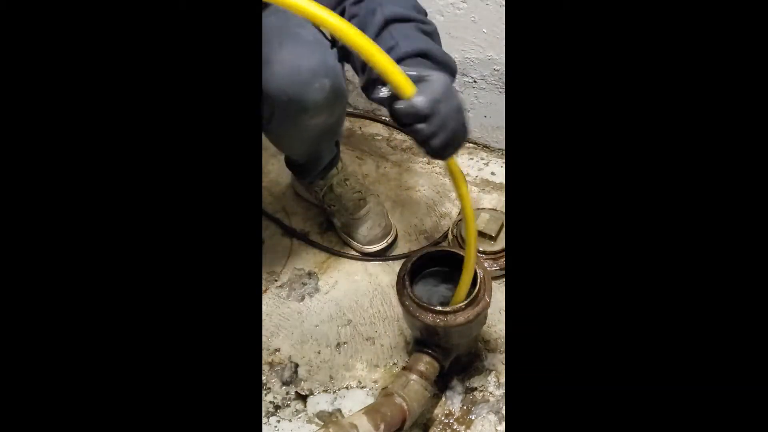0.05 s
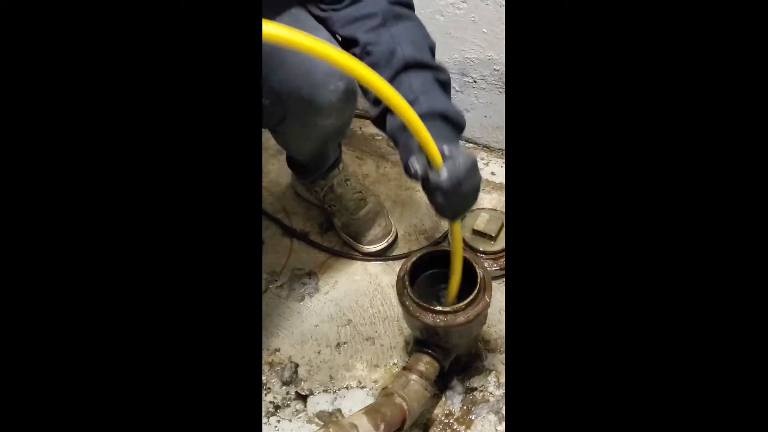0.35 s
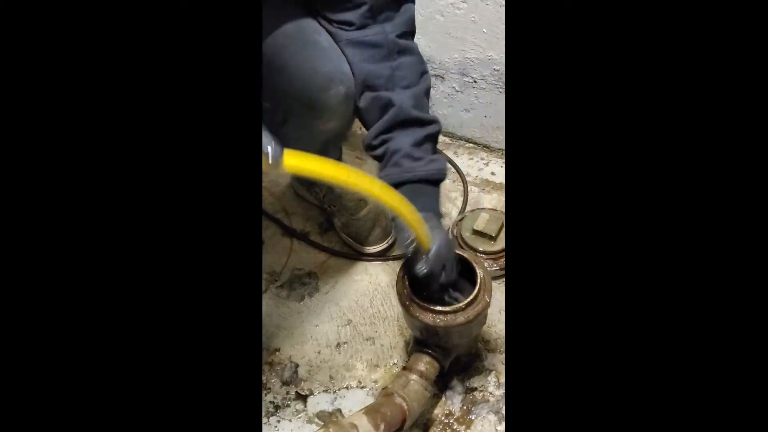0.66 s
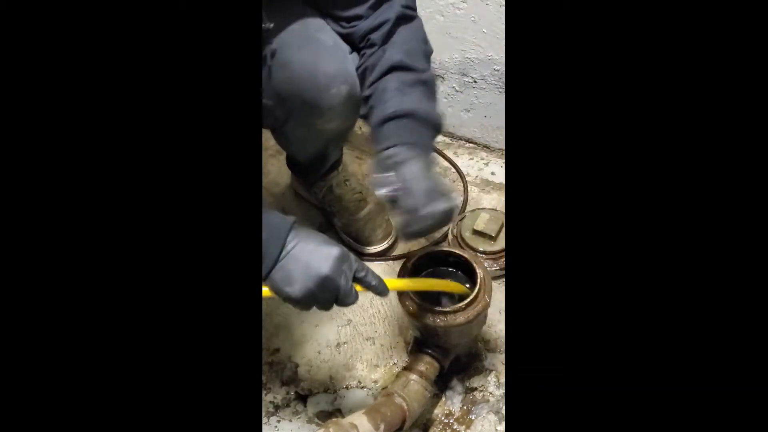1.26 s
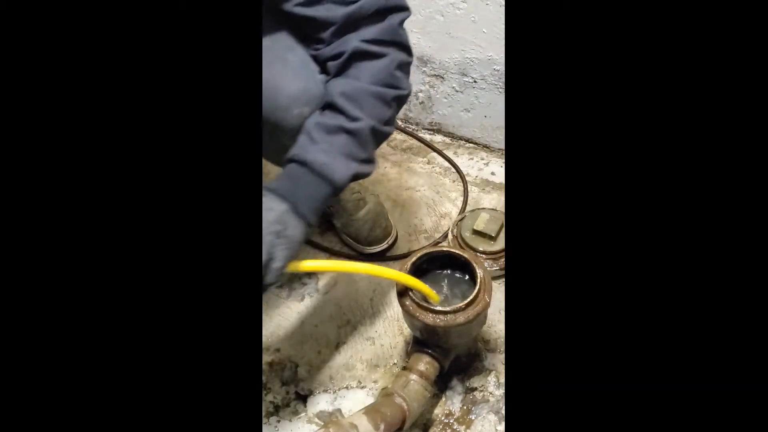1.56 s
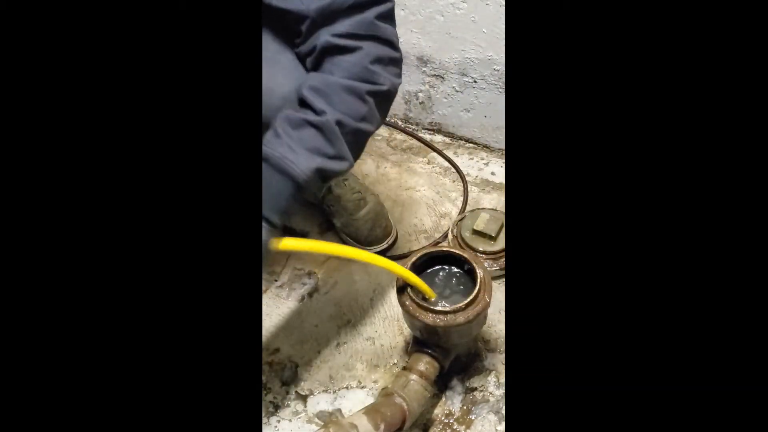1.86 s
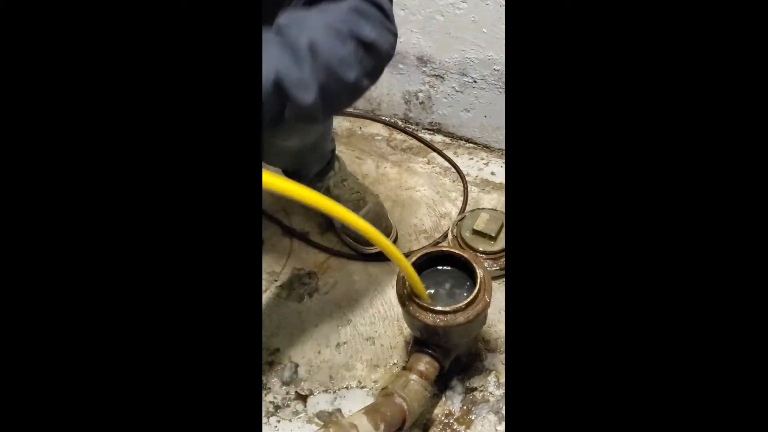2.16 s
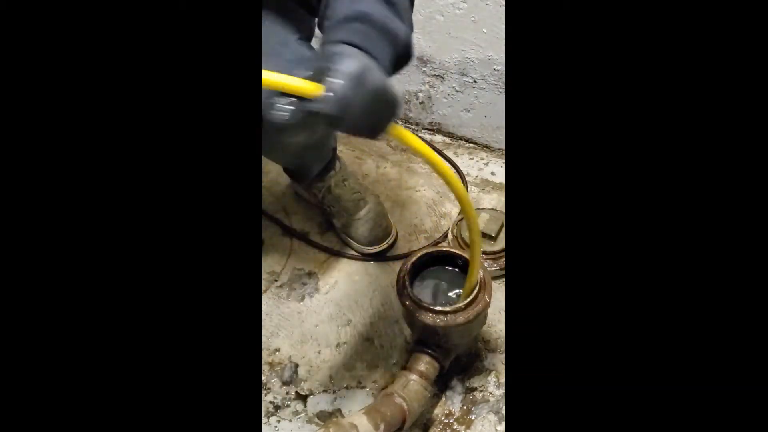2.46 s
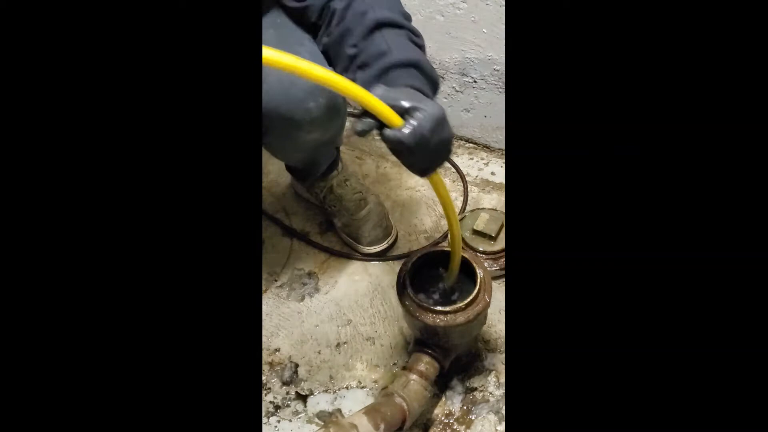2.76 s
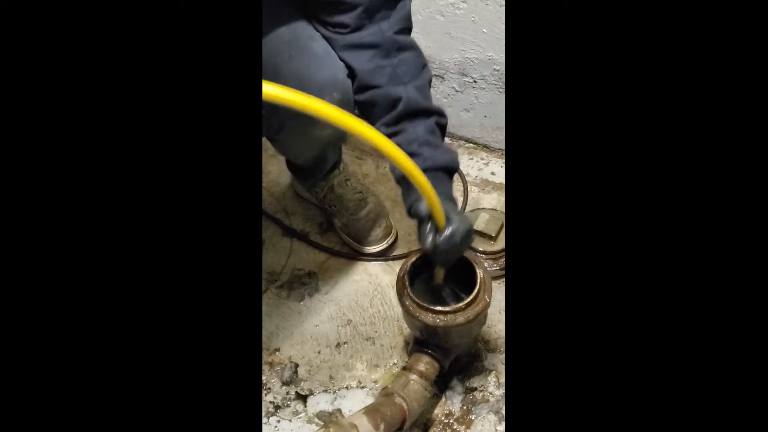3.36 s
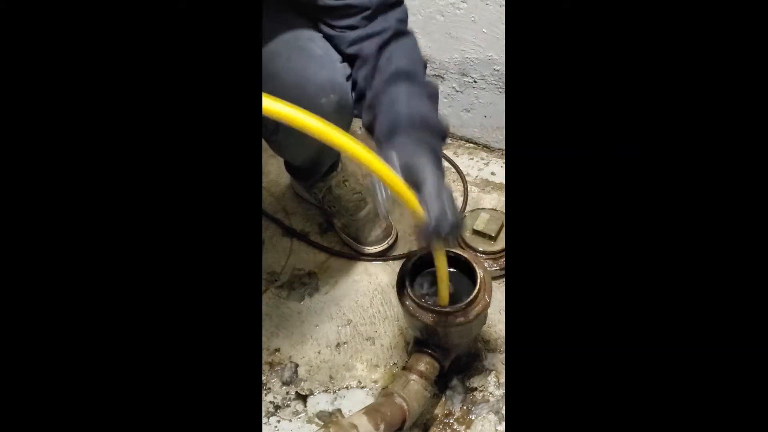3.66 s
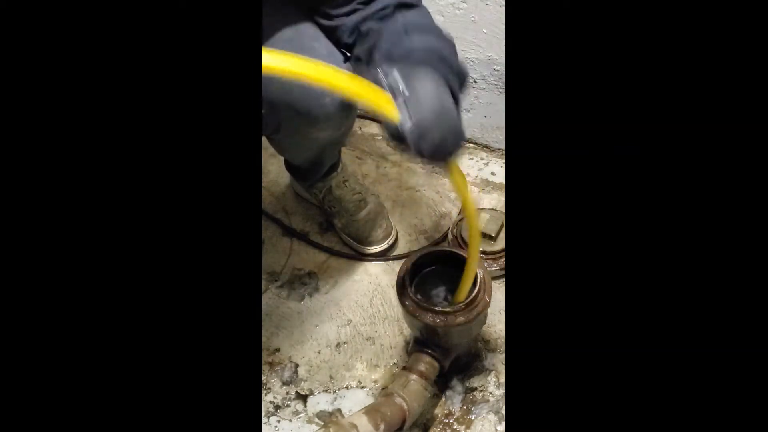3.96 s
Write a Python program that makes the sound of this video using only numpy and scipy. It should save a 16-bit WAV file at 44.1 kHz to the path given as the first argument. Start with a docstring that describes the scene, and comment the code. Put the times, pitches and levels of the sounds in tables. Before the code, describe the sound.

High motor whine of a drain cleaner, with a hose scraping hollowly inside a drain.

```python
"""Drain cleaning machine in a basement

A hose is fed by hand into a floor drain. Over a bed of rushing cooling air, the motor whines on
multiples of its shaft speed, which wavers with the load. The hose scrapes inside the pipe with
an uneven rumble and a hollow boom that throbs, with a dull knock, whenever it catches."""
import sys
import numpy as np
from scipy import signal
from scipy.fft import rfft, irfft
from scipy.io import wavfile
from scipy.ndimage import uniform_filter1d

SR = 44100
rng = np.random.default_rng(int(sys.argv[2]) if len(sys.argv) > 2 else 0)


def wrap_up_sound(samples):
    """Save the sound to the file named by the first command line argument, as 16-bit audio."""
    columns = np.atleast_2d(samples).T
    # keep every value between -1 and 1, then stretch to whole-number steps
    tamed = np.clip(columns, -1, 1)
    steps = np.round(tamed * 32767).astype(np.int16)
    wavfile.write(sys.argv[1], SR, steps)


N = 176400
TIME = np.arange(N) / SR
FREQS = np.maximum(np.arange(N // 2 + 1) * SR / N, 1)

# stereo image of the noise layers: (frequency [Hz], left-right correlation [0-1])
STEREO_LIKENESS = [(30, 0.5), (130, 0.93), (260, 0.83), (520, 0.66), (1000, 0.28), (3000, 0), (15000, 0)]
# colour of the air rush: (frequency [Hz], left base density [dB], right base density [dB])
AIR_SPECTRUM = [(20, -92, -90), (70, -91, -75), (154, -89.5, -76), (286, -75.5, -63), (480, -75, -77.5),
                (830, -84, -76), (1500, -76, -72.5), (1980, -72, -80.5), (2420, -74, -69.5),
                (2980, -64.5, -64.5), (3570, -68, -70), (4490, -65, -67), (5100, -72.5, -75),
                (5600, -69, -76), (6560, -73.5, -74.5), (7370, -72, -80), (9700, -87, -78),
                (10400, -78.5, -80.5), (11200, -80.5, -87), (11800, -82, -80), (12900, -84.5, -83),
                (14600, -79.5, -81.5), (15600, -81, -82)]
# housing resonances in the air stream: (frequency [Hz], half-width [Hz], left [dB], right [dB])
HOUSING_MODES = [(717, 7, -59, -53), (656, 8, -60, -57), (802, 5, -72, -60), (1183, 36, -62, -42.5),
                 (1250, 30, -59, -50), (2772, 45, -53, -44), (2903, 45, -51, -45.5), (4570, 60, -50, -53),
                 (10150, 220, -60, -51)]

# pitch of the main whine under load: (time [s], pitch [Hz])
WHINE_PITCH = [(0.0, 3512), (0.24, 3536), (0.3, 3505), (0.34, 3501), (0.46, 3505), (0.54, 3527),
               (0.58, 3525), (0.76, 3482), (0.92, 3534), (1.18, 3514), (1.28, 3535), (1.36, 3532),
               (1.44, 3543), (1.48, 3533), (1.54, 3497), (1.6, 3506), (1.68, 3533), (1.78, 3538),
               (1.86, 3549), (1.92, 3511), (2.1, 3542), (2.26, 3551), (2.32, 3520), (2.44, 3541),
               (2.52, 3536), (2.62, 3541), (2.72, 3514), (2.9, 3502), (3.04, 3522), (3.1, 3495),
               (3.14, 3496), (3.2, 3515), (3.3, 3529), (3.36, 3527), (3.42, 3497), (3.48, 3499),
               (3.54, 3521), (3.7, 3536), (3.8, 3483), (3.9, 3511), (3.96, 3505), (4.0, 3510)]
# motor tones: (shaft multiple, left base level [dB], right base level [dB], room share [0-1])
MOTOR_TONES = [(3, -48, -48, .3), (12, -52, -65, .5), (19, -53, -45.5, .4), (22, -46, -45.5, .25),
               (23.33, -48, -52, .7), (24, -31, -31, .1), (25, -37, -39.5, .3), (28, -45, -44.5, .2),
               (31, -44, -47.5, .35), (39, -51, -57, .9), (47, -53, -56.5, .7), (48.27, -37, -45, .2),
               (50, -56, -59, .8)]
# stereo phase of some tones: {shaft multiple: lead of the left side [rad]}
TONE_LEAD = {22: -2.0, 25: .3, 28: -.5, 31: -1.1, 48.27: .5}
# level ride of the main whine, taken about its mean: (time [s], left [dB], right [dB])
WHINE_RIDE = [(0.0, -30.0, -31.0), (0.22, -30.0, -33.0), (0.4, -28.0, -30.0), (0.92, -33.5, -34.0),
              (1.18, -30.5, -32.5), (1.28, -34.0, -35.5), (1.58, -33.0, -31.0), (1.74, -33.0, -34.0),
              (2.64, -35.0, -35.0), (3.02, -31.5, -32.0), (3.12, -34.0, -30.0), (3.26, -30.5, -35.5),
              (3.48, -34.0, -30.5), (3.58, -32.5, -37.0), (3.8, -36.0, -31.0), (4.0, -34.5, -34.5)]
# level ride of the whistle an octave above, taken about its mean: (time [s], level [dB])
WHISTLE_RIDE = [(0.0, -39.5), (0.26, -37), (0.44, -50), (0.56, -34), (0.66, -45.5), (0.74, -37.0),
                (0.82, -43), (0.88, -32.5), (1.2, -38), (1.54, -41.5), (1.7, -38.5), (1.8, -41.5),
                (2.28, -40.5), (2.64, -41), (3.34, -41), (3.4, -42.5), (3.66, -39), (4.0, -42.5)]

# push of the scraping hose: (time [s], bass base level [dB], low-mid level [dB])
SCRAPE_LEVEL = [(0, -51, -37.5), (.25, -51, -37), (.275, -36, -24.5), (.34, -34, -27.5), (.4, -34, -33),
                (.47, -43, -33), (.54, -44, -37.5), (.8, -39, -40), (1, -36.5, -39), (1.15, -35, -31),
                (1.23, -40, -37.5), (1.5, -40, -31), (1.6, -37, -36), (1.85, -41.5, -43),
                (2.15, -53.5, -45), (2.37, -46.5, -42), (2.4, -34, -28.5), (2.55, -38.5, -33.5),
                (2.68, -35, -31.5), (2.9, -40.5, -32), (2.98, -40, -37.5), (3.4, -42.5, -38.5),
                (3.62, -41, -35.5), (3.85, -44, -42), (4, -43, -42.5)]
# bass modes of the pipe: (frequency [Hz], half-width [Hz], relative level [dB])
PIPE_BASS_MODES = [(54, 6.5, -18), (74, 9.3, -16.5), (85, 6.2, -8.5), (114.8, 6, -3.5), (133, 6.7, -9.5),
                   (148.1, 12.5, 1.5), (160, 4, -4.5), (189, 6, -2.5)]
# low-mid modes of the pipe: (frequency [Hz], half-width [Hz], relative level [dB])
PIPE_MID_MODES = [(225, 7.8, 1), (263, 8.7, 0.5), (282.5, 17, -9.5), (297, 21, -4), (312.6, 13.5, -0.5),
                  (334, 8.2, -2.5), (369, 5.7, -11), (399, 14, -14), (418, 9.8, -12), (509, 19, -13),
                  (636, 55, -15.5)]
# sustained hollow boom of the pipe: (time [s], level [dB])
BOOM_LEVEL = [(0, -43), (.23, -48), (.3, -42), (.5, -32), (.7, -43.5), (.9, -34), (1.05, -35), (1.19, -45),
              (1.35, -32.5), (1.6, -34.5), (1.88, -36), (2.15, -53), (2.36, -51), (2.48, -29), (2.6, -29.5),
              (2.75, -35.5), (3.1, -41.5), (3.52, -42), (3.7, -32), (4, -37)]
# swells of the boom as the hose catches: (time [s], peak level [dB], half-length [s])
CATCHES = [(0.318, -17, 0.044), (0.435, -25.5, 0.036), (0.494, -28.5, 0.018), (0.88, -27.5, 0.013),
           (0.965, -26, 0.024), (1.031, -22, 0.054), (1.131, -22, 0.03), (1.235, -25.5, 0.027),
           (1.432, -29, 0.034), (1.555, -28.5, 0.046), (1.643, -26.5, 0.016), (2.51, -31.5, .05),
           (2.701, -29, .03), (2.83, -29, 0.029), (3.06, -35, 0.058), (3.26, -33.5, 0.034),
           (3.407, -35, 0.05), (3.58, -33.5, 0.027), (3.931, -28, 0.033)]
# knock of the hose on the pipe wall: (frequency [Hz], half-width [Hz], relative level [dB])
WALL_MODES = [(524, 63, 1), (665, 130, -1.5), (1000, 180, -2)]


def from_db(db):
    """Decibels to gain."""
    return 10 ** (np.asarray(db) / 20)


def rms_one(x):
    """Scale to rms 1."""
    return x / np.sqrt(np.mean(x ** 2) + 1e-20)


def in_time(rows):
    """Each column of an envelope at every sample."""
    times, *columns = np.transpose(rows)
    return [np.interp(TIME, times, c) for c in columns]


def in_hz(rows):
    """Each column of a spectrum at every frequency."""
    hz, *columns = np.transpose(rows)
    return np.array([np.interp(np.log(FREQS), np.log(hz), c) for c in columns])


def ride(rows):
    """Each column of a level envelope in dB about its mean."""
    db = np.array(in_time(rows))
    return db - db.mean(axis=1, keepdims=True)


def drift(rate_hz):
    """Smooth random modulation of rms 1, rolling off above the given rate."""
    hop, settle = 40, 2000
    pole = np.exp(-2 * np.pi * rate_hz * hop / SR)
    noise = rng.standard_normal(N // hop + settle + 2)
    slow = signal.lfilter([1], [1, -2 * pole, pole * pole], noise)[settle:]
    return np.interp(np.arange(N) / hop, np.arange(len(slow)), rms_one(slow))


def resonance(hz, half_width_hz):
    """Gain of a steep-sided resonance that turns unit white noise into rms 1."""
    return rms_one(1 / (1 + ((FREQS - hz * hz / FREQS) / (2 * half_width_hz)) ** 2))


def stereo_noise(power):
    """Noise with the given power spectrum, narrow in the bass and wide in the treble."""
    mid, side = rfft(rng.standard_normal((2, N)))
    alike = in_hz(STEREO_LIKENESS)[0]
    white = (np.sqrt(1 + alike) * mid + np.sqrt(1 - alike) * side * [[1], [-1]]) / np.sqrt(2)
    return irfft(white * np.sqrt(power), N)


def cooling_air():
    """A broad, faintly flickering rush with the resonances of the housing standing out of it."""
    trim_db, flicker_db = 0.16, 0.62
    power = from_db(in_hz(AIR_SPECTRUM) + trim_db) ** 2 * SR / 2
    for hz, half_width_hz, left_db, right_db in HOUSING_MODES:
        power += (from_db([[left_db], [right_db]]) * resonance(hz, half_width_hz)) ** 2
    return stereo_noise(power) * from_db(flicker_db * drift(rate_hz=10))


def motor_whine():
    """Tones locked to the shaft, each a clean direct part plus a flickering part from the room."""
    whine_order = 24   # shaft multiple of the main whine
    drive_hz, wobble, jitter, flutter_db = 16.3, 0.0018, 0.001, 1.06
    ring_hz, ring_half_width_hz, ring_peak_db = 3250, 14, 7.5
    # each turn of the drive tugs at speed and level
    drive = np.sin(2 * np.pi * np.cumsum(drive_hz * (1 + 0.024 * drift(rate_hz=2.4))) / SR)
    waver = 1 + wobble * drive + jitter * drift(rate_hz=30.4)
    shaft_hz = in_time(WHINE_PITCH)[0] / whine_order * waver
    shaft_angle = 2 * np.pi * np.cumsum(shaft_hz) / SR
    rides_db = {whine_order: ride(WHINE_RIDE), 2 * whine_order: ride(WHISTLE_RIDE)}
    tilt_orders = [MOTOR_TONES[0][0], whine_order, MOTOR_TONES[-1][0]]
    out = np.zeros((2, N))
    for order, left_db, right_db, room_share in MOTOR_TONES:
        lead = np.array([[TONE_LEAD.get(order, 0)], [0]])
        phase = order * shaft_angle + rng.uniform(0, 2 * np.pi) + lead
        room = np.array([drift(rate_hz=28) * np.cos(p) + drift(rate_hz=28) * np.sin(p) for p in phase])
        tone = np.sqrt(2 * (1 - room_share)) * np.cos(phase) + np.sqrt(room_share) * room
        tilt_db = np.interp(order, tilt_orders, [3.57, -0.58, -1.25])
        # a narrow housing resonance lifts any tone that glides through it
        ring_db = ring_peak_db / (1 + ((order * shaft_hz - ring_hz) / ring_half_width_hz) ** 2)
        gain = from_db(tilt_db + ring_db + rides_db.get(round(order), 0) + flutter_db * drive)
        out += from_db([[left_db], [right_db]]) * gain * tone
    return out


def pipe_ring(modes):
    """Friction noise ringing in a set of pipe modes, levelled to stay near rms 1."""
    power = sum((from_db(db) * resonance(hz, half_width_hz)) ** 2 for hz, half_width_hz, db in modes)
    ring = stereo_noise(power)
    window = int(0.079 * SR)
    running_power = uniform_filter1d(uniform_filter1d(np.mean(ring ** 2, axis=0), window), window)
    return ring / np.sqrt(running_power + 1e-9)


def hose_rumble():
    """The hose scrapes along the pipe, harder with each push; the bass surges as it sticks and slips."""
    bass_trim_db, surge_db = -1, 1
    bass_db, mid_db = in_time(SCRAPE_LEVEL)
    bass_gain = from_db(bass_db + bass_trim_db + surge_db * drift(rate_hz=7.9))
    return bass_gain * pipe_ring(PIPE_BASS_MODES) + from_db(mid_db) * pipe_ring(PIPE_MID_MODES)


def pipe_boom():
    """The strongest pipe resonance hums unsteadily; each catch swells it and adds a dull knock."""
    boom_hz, wander_hz, flutter_db, left_lag_rad = 234.5, 4.91, 2, 0.31
    knock_db = -24.5   # relative to the swell
    swells = sum(from_db(db) * np.exp(-2 * ((TIME - at) / half_s) ** 2) for at, db, half_s in CATCHES)
    sustain = from_db(in_time(BOOM_LEVEL)[0])
    level = np.hypot(sustain, swells) * from_db(flutter_db * drift(rate_hz=34))
    phase = 2 * np.pi * np.cumsum(boom_hz + wander_hz * drift(rate_hz=9.77)) / SR
    hum = np.sqrt(2) * level * np.sin([phase - left_lag_rad, phase])
    knocks = from_db(knock_db) * swells * pipe_ring(WALL_MODES)
    return hum + knocks


def scene():
    """Stereo mix of the machine and the hose in the drain."""
    return motor_whine() + cooling_air() + hose_rumble() + pipe_boom()


def record(dry):
    """A steep high cut takes off the very top."""
    cutoff_hz = 15750
    return signal.sosfilt(signal.ellip(12, .1, 90, cutoff_hz, fs=SR, output="sos"), dry)


dry = scene()
out = record(dry)
wrap_up_sound(out)
```